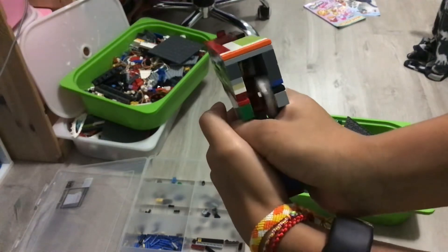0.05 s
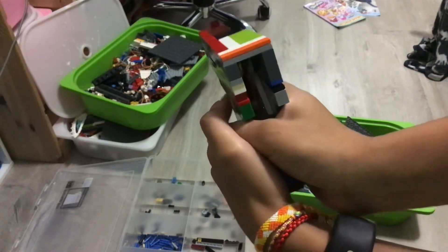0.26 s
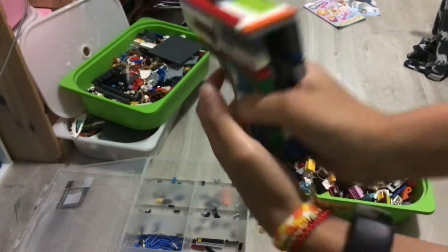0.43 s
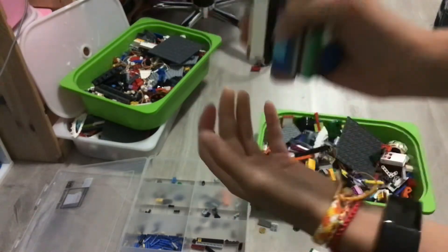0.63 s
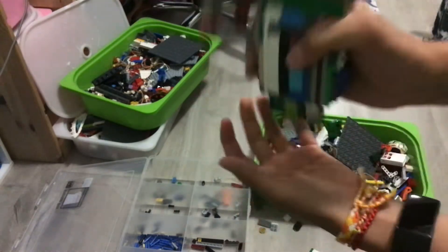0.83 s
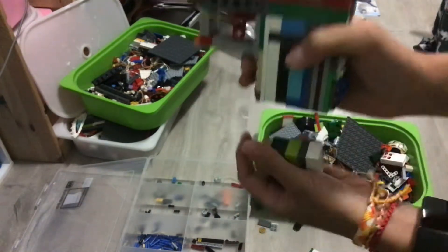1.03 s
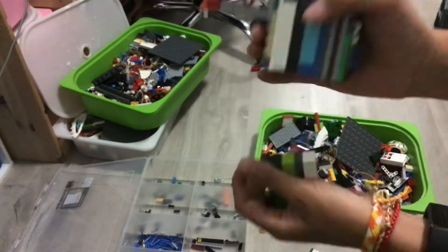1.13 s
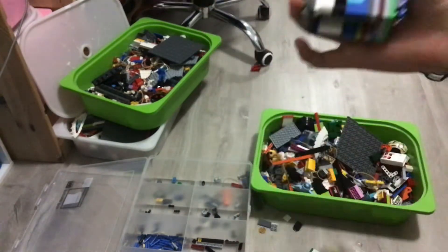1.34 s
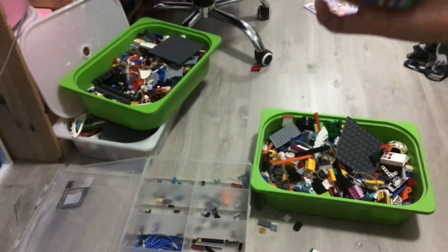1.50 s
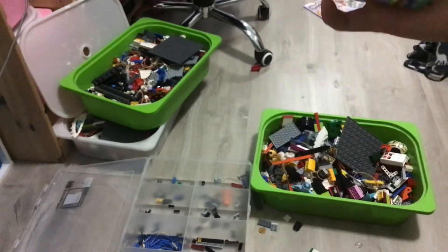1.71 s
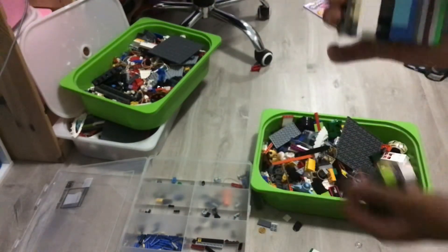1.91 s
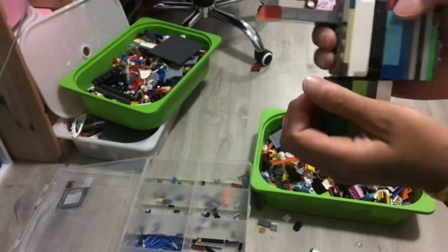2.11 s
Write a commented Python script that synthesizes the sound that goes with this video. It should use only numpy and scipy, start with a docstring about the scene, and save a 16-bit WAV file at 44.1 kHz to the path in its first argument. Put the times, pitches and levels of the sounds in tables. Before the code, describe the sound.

Plastic brick toy handled up close: a brief sliding scrape, a loud bright snap with quick fading bounces, faint clicks and a hollow knock as a piece slides out, a pause, then more clicks in a quiet room.

```python
"""First a fading sliding noise and the tail of an earlier click; then a toy of plastic bricks snaps shut
and bounces, a piece slides out into the palm with small clicks, and is caught again.
Each click is a short chatter of tiny impacts exciting the damped modes of the hollow bricks. Rubbing is
dense impacts on the same modes, knocks, thuds and squeaks are resonances with their own excitation,
and a quiet room adds a short bright tail, a low hum of air and a dull rustle of hands and sleeves."""
import sys
import numpy as np
from scipy import signal
from scipy.io import wavfile
from scipy.ndimage import uniform_filter1d

SR = 44100
rng = np.random.default_rng(int(sys.argv[2]) if len(sys.argv) > 2 else 0)


def gain_from_db(level_db):
    """Convert decibel levels to linear amplitude factors (20 dB per decade)."""
    decades = np.asarray(level_db, float) / 20
    return 10 ** decades


def unload_audio(sound):
    """Save the sound as a 16-bit wav file, at the path given as the first command line argument."""
    columns = np.transpose(np.atleast_2d(sound))
    # keep every value between -1 and 1, then stretch to whole-number steps
    steps = np.round(np.clip(columns, -1, 1) * 32767)
    wavfile.write(sys.argv[1], SR, steps.astype(np.int16))


N = 94815
LEAD = 4410  # samples computed ahead of the first audible one

# Room air, relative spectral density: (frequency [Hz], level [dB per Hz])
AIR_SPECTRUM = [(18, -31), (30, -1), (165, -3), (210, -13), (295, -4), (721, -16), (937, -34), (1760, -26),
                (3140, -34), (8300, -33), (16000, -43)]
AIR_DB = -70  # rms
# Reverberation time: (frequency [Hz], t60 [s])
ROOM_DECAY = [(150, 0.15), (600, 0.22), (1500, .33), (3000, .33), (4500, .28), (6000, .3), (9000, .24),
              (14000, .2)]
# Reflected energy relative to the direct sound, and the fade-in time of the tail
ROOM_DB, ROOM_GAP_S, NEAR_DB, NEAR_T60_S = -15.5, .008, -10.5, 0.086
# Rustle of hands and sleeves: (time [s], mean level [dB])
RUSTLE_LEVELS = [(0, -82), (0.698, -88), (.85, -68.5), (1.0, -74), (1.2, -80), (1.45, -85), (1.6, -75.5),
                 (1.9, -72.5), (2.15, -72)]

# Modes of the bricks and of the whole toy: (frequency [Hz], relative level [dB], longest t60 [s])
THUD_MODES = [(120, -2, .04), (227, -1.5, .025), (330, -2.5, .03)]
HOLLOW_MODES = [(487, -8, .025), (590, 1, .03), (690, 1, .03)]
LOW_MODES = [(1060, -6, 0.0064), (1380, -2.5, .009), (1730, -0.5, .009), (1960, -2, 0.012),
             (2300, 0, 0.008), (2830, 1.5, 0.0091), (3250, 1, .008), (3590, -3, .007)]
MID_MODES = [(3850, -2, .008), (4250, -2.5, .007), (4640, 0.5, .008), (4810, -0.5, .008),
             (5350, -2.5, .005), (5770, 1.5, .007), (6180, -0.5, .006), (6780, 0, 0.0069)]
HIGH_MODES = [(7660, 0.5, .005), (8200, 0, .005), (8700, 0.5, .005), (9130, 0, .005), (9800, -9.5, .003),
              (10900, -16, .002), (12000, -18, .002), (14000, -21, .002)]
MODE_GROUPS = (LOW_MODES, MID_MODES, HIGH_MODES)
# Pass band of each group of modes: (lower edge [Hz], upper edge [Hz])
GROUP_BANDS = [(800, 3800), (3500, 7500), (6800, 16000)]
DETUNE, COLOUR_DB = .012, 1.5  # spread of mode frequency (relative) and of mode level
FALL_DB_PER_OCTAVE = 16  # away from the strongest pitch
MOST_CYCLES = 36  # a mode's t60 lasts no longer than this many periods
STILL = np.zeros((2, 8))  # no spread of frequency or level

# Strokes of loose parts sliding: (time [s], low modes [dB], middle modes [dB], high modes [dB])
SLIDE_STROKES = [
    [(0, -64, -66, -77), (.05, -72, -68, -71), (.09, -62, -72, -76), (.15, -82, -83, -86),
     (.2, -76, -74, -74)],
    [(.6, -87, -89, -99.5), (.66, -89, -82.5, -90.5), (.73, -65, -73.5, -81), (.76, -62.5, -68.5, -73),
     (.79, -65, -76.5, -81), (.82, -71.5, -70, -73), (.86, -66, -76, -75.5), (.92, -84, -73.5, -82),
     (1.0, -80, -80, -91.5), (1.2, -89, -94.5, -109)],
    [(1.98, -100, -100, -105), (2.04, -90, -86, -84.5), (2.06, -66.5, -67.5, -68),
     (2.11, -72, -71.5, -72.5), (2.15, -64, -60, -69)],
]
RUBS_PER_S, IMPACTS_PER_S = 14000, 10000
SIZE_DB = 2  # impact level spread, per e-fold of chance
# Squeaks swelling just before some clicks: (end time [s], level at the end [dB])
SQUEAKS = [(.1565, -60), (.216, -40.5), (.879, -58)]
SQUEAK_HZ, SQUEAK_RISE_DB_PER_S, SQUEAK_WIDTH_HZ = 7940, 2000, 450
# Pushes of the whole toy under the larger blows: (time [s], deep level [dB], hollow level [dB])
THUDS = [(.2155, -40, -39), (.833, -57, -58), (.850, -63, -52), (.875, -64, -52.5), (1.313, -69, -64),
         (1.9945, -62, -57), (2.051, -59, -43), (2.134, -54.5, -55)]
# Hollow knocks of the piece against the palm: (time [s], level [dB], length [s], pitch [Hz])
KNOCKS = [(.772, -54.5, 0.011, 1330), (.833, -41.5, 0.0088, 1390), (.845, -53, 0.015, 1310),
          (2.052, -37, 0.0024, 1730), (2.094, -45.5, 0.0047, 1720), (2.125, -51.5, 0.013, 1800),
          (2.138, -48, .009, 1750)]
KNOCK_WIDTH_HZ, KNOCK_WIDE_DB = 260, -3
# Clicks: (time [s], middle level [dB], low level [dB], high level [dB], chatter length [s],
# strongest low pitch [Hz], strongest middle pitch [Hz]); a chatter lasts at least 0.6 ms
CLICKS = [(.0868, -38, -49, -45, .0032, 2300, 4600), (.1562, -40, -39, -41, .003, 2700, 5000),
          (.2118, -50, -42.5, -55.5, .0031, 2790, 4500), (.2157, -12, -26, -19, .0026, 3260, 4700),
          (.2236, -18.5, -33.5, -27.5, .0026, 3100, 4900), (.2303, -25, -42, -28, .002, 3000, 4800),
          (.2360, -28, -49, -32, .0028, 3300, 4930), (.2420, -35.5, -41.5, -44, .003, 3287, 4800),
          (.3892, -75, -62, -67, .0014, 1469, 5000), (.4394, -73, -64, -76, .003, 3300, 3980),
          (.7400, -68, -65.5, -72, .0043, 2500, 4500), (.7462, -53, -57, -48.5, 0.0028, 2700, 4800),
          (.7530, -55, -55.5, -72, .0026, 3300, 4000), (.7722, -66.5, -57.5, -75, 0.00407, 1500, 4000),
          (.8057, -57.5, -59, -54.5, .002, 3300, 4217), (.8122, -53.5, -64, -53, .003, 3000, 5400),
          (.8305, -62, -47, -67, .003, 2700, 4100), (.8530, -61, -47.5, -64, .0043, 2500, 4100),
          (.8790, -46.5, -66, -44, .002, 2800, 6400), (.8886, -64, -45, -62, .003, 2820, 4000),
          (.9275, -64, -72, -60, .001, 2520, 6000), (1.3140, -88, -68, -105, 0.0019, 1050, 4000),
          (1.9948, -99, -74, -99, .0022, 1000, 4000), (2.0504, -39, -46, -39, .0017, 1900, 4500),
          (2.0521, -40.5, -42, -42.5, .003, 1730, 4500), (2.0600, -48, -48, -62, .006, 2000, 5200),
          (2.0910, -56, -56.5, -65, .002, 1800, 4000), (2.0938, -43.5, -41.5, -41, .002, 1780, 4000),
          (2.1345, -52, -43.5, -63, .003, 2800, 4000)]
# The click before the start, of which only the tail is heard: the same columns without time
EARLIER_CLICK = (-30, -32.5, -34.5, -0.01, 2800, 5200.5)
EARLIER_S = -.018
FIRM_IMPACT_DB = 8  # at the height of the chatter
RATTLE_DB, RATTLE_T60_S = -14.5, 0.042

DIP_HZ, DIP_WIDTH_HZ = 850, 130  # a narrow dip in the toy's sound, where its hollow and low modes cancel
MIC_HZ, MIC_WIDTH_HZ, MIC_PEAK_DB, MIC_LOW_HZ = 8380, 940, 5.5, 45


def evened(x):
    """Normalization to unit rms."""
    return x / np.sqrt(np.mean(x ** 2) + 1e-20)


def peaked(x, db):
    """Short-time level: the loudest 3 ms are set to db rms."""
    return gain_from_db(db) * x / np.sqrt(uniform_filter1d(x ** 2, size=132).max())


def read(points, hz):
    """Interpolation of a table along a logarithmic frequency axis."""
    f, value = np.transpose(points)
    return np.interp(np.log(hz + 1), np.log(f + 1), value)


def add(mix, s, sound):
    """Superposition: a sound is added to the mix from time s on."""
    part = mix[round(s * SR) + LEAD:][:len(sound)]
    part += sound[:len(part)]


def band(x, low_hz, high_hz, order=3):
    """Band limitation by a Butterworth filter."""
    return signal.sosfilt(signal.butter(order, (low_hz, high_hz), "band", fs=SR, output="sos"), x)


def air():
    """Stationary broadband noise: random Fourier coefficients shaped by a spectrum, with drifting patches."""
    frames, hz = N // 256 + 5, np.fft.rfftfreq(1024, 1 / SR)
    real, imaginary, patches = rng.standard_normal((frames, 513, 3)).T
    patches = uniform_filter1d(patches, size=8, axis=0)
    patches = evened(uniform_filter1d(patches, size=12, axis=1))
    z = (real + 1j * imaginary) * gain_from_db(read(AIR_SPECTRUM, hz)[:, None] + 0.5 * patches)
    return gain_from_db(AIR_DB) * evened(signal.istft(z, nperseg=1024, noverlap=768)[1][:N])


def rustle():
    """Amplitude-modulated noise: a dull band whose level wanders in small lumps."""
    s, db = np.transpose(RUSTLE_LEVELS)
    lumps = evened(uniform_filter1d(rng.standard_normal(N), size=900))
    dull = band(rng.standard_normal(N), 250, 850)
    return gain_from_db(np.interp(np.arange(N) / SR, s, db) + 2.0 * lumps) * evened(dull)


def room(x):
    """Reverberation as convolution: sparse taps of random sign, near surfaces first, then a banded tail."""
    size = SR // 2
    taps, t = np.zeros(size), np.arange(size) / SR
    at = np.arange(20, size - 12, 12)
    taps[at + rng.integers(0, 12, len(at))] = rng.choice([-1., 1.], len(at))
    near = taps * gain_from_db(-60 * t / NEAR_T60_S)
    # each frequency band dies at its own rate
    hz, frame_t, z = signal.stft(taps, SR, nperseg=256)
    decay = gain_from_db(-60 * frame_t / read(ROOM_DECAY, hz)[:, None])
    tail = signal.istft(z * decay, SR, nperseg=256)[1][:size]
    tail = tail * np.clip(t / ROOM_GAP_S, 0, 1) ** 2
    near = gain_from_db(NEAR_DB) * near / np.linalg.norm(near)
    tail = gain_from_db(ROOM_DB) * tail / np.linalg.norm(tail)
    return signal.fftconvolve(x, near + tail)[:len(x)]


def ring(modes, chance, edges=None, top_hz=None):
    """Modal impulse response: damped sinusoids, varied in frequency and level by chance."""
    hz, db, t60 = np.transpose(modes)[:, :, None]
    t, c = np.arange(3000) / SR, chance[:, :len(modes), None]
    if top_hz:
        db = db - FALL_DB_PER_OCTAVE * abs(np.log2(hz / top_hz))
    hz = np.minimum(hz * (1 + DETUNE * c[0]), 16000)
    t60 = np.minimum(t60, MOST_CYCLES / hz)
    out = (gain_from_db(db + COLOUR_DB * c[1] - 60 * t / t60) * np.sin(2 * np.pi * hz * t)).sum(0)
    return band(out, *edges) if edges else out


def impacts(size, per_s):
    """Random impulse train: sparse impacts of random sign, a few of them large."""
    u = rng.random((size, 3))
    happens = u[:, 0] < per_s / SR
    return happens * np.sign(u[:, 1] - .5) * gain_from_db(-SIZE_DB * np.log(u[:, 2] + .02))


def slide():
    """Friction as dense small impacts that excite each group of modes under the level of the stroke."""
    t = (np.arange(N + LEAD) - LEAD) / SR
    rubs, out = impacts(N + LEAD, RUBS_PER_S), 0
    for rows in SLIDE_STROKES:
        s, *levels = np.transpose(rows)
        for modes, db, edges in zip(MODE_GROUPS, levels, GROUP_BANDS):
            rung = signal.oaconvolve(rubs, ring(modes, STILL, edges))[:len(t)]
            # silent outside its stroke, but the last stroke holds its level to the end
            after = db[-1] if s[-1] > 2 else -200
            out = out + gain_from_db(np.interp(t, s, db, -200, after)) * evened(rung)
    return out


def squeak(s, db):
    """Exponential growth of a high tone up to the click, made fuzzy by narrow-band noise on its phasor."""
    t = np.arange(-1500, 0) / SR
    r = np.exp(-np.pi * SQUEAK_WIDTH_HZ / SR)
    noise = signal.lfilter([1], [1, -r], rng.standard_normal((1500, 2)), axis=0)
    fuzz = 1 + 0.3 * evened(noise) @ [1, 1j]
    tone = (fuzz * np.exp(2j * np.pi * SQUEAK_HZ * t)).real
    return s - 1500 / SR, gain_from_db(db + SQUEAK_RISE_DB_PER_S * t) * np.sqrt(2) * tone


def thud(s, deep_db, hollow_db):
    """Excitation by a soft force pulse, whose smoothness favours the lowest modes."""
    deep_chance, hollow_chance = rng.standard_normal((2, 2, 8))
    deep = np.convolve(np.hanning(60), ring(THUD_MODES, deep_chance))[:3000]
    hollow = np.convolve(np.hanning(30), ring(HOLLOW_MODES, hollow_chance))[:3000]
    return s, peaked(deep, deep_db) + peaked(hollow, hollow_db)


def knock(s, db, length_s, hz):
    """Noise excitation of a cavity: a soft rubbing blow drives one hollow tone and the brick modes."""
    t = np.arange(3000) / SR
    drive = rng.standard_normal(3000) * np.exp(-(2 * t / length_s - 1) ** 4)
    tone = np.exp(-np.pi * KNOCK_WIDTH_HZ * t) * np.sin(2 * np.pi * hz * t) * np.minimum(t * hz, 1)
    low, mid, high = (ring(m, STILL, e) for m, e in zip(MODE_GROUPS, GROUP_BANDS))
    hollow = evened(signal.fftconvolve(drive, tone))
    wide = evened(signal.fftconvolve(drive, low + mid + .4 * high))
    return s, peaked(hollow + gain_from_db(KNOCK_WIDE_DB) * wide, db)


def click(s, mid_db, low_db, high_db, length_s, low_hz, mid_hz):
    """Modal excitation by one firm impact in a chatter of small ones, then a dying rattle of loose bricks."""
    t = np.arange(1500) / SR
    u = np.clip(t / max(length_s, .0006), 0, 1)
    chatter = np.sin(np.pi * u ** 0.5) ** 0.5
    shape = chatter + u * gain_from_db(RATTLE_DB - 60 * t / RATTLE_T60_S)
    firm = gain_from_db(FIRM_IMPACT_DB) * (np.arange(1500) == np.argmax(shape))
    levels, pitches = (low_db, mid_db, high_db), (low_hz, mid_hz, None)
    chances = rng.standard_normal((3, 2, 8))
    out = 0
    for modes, db, chance, edges, top_hz in zip(MODE_GROUPS, levels, chances, GROUP_BANDS, pitches):
        drive = firm + shape * impacts(1500, IMPACTS_PER_S)
        out = out + peaked(signal.fftconvolve(drive, ring(modes, chance, edges, top_hz)), db)
    return s, out


def scene():
    """Superposition of the toy's direct sound, its reverberation, the air and the rustle."""
    toy = slide()
    add(toy, *click(EARLIER_S, *EARLIER_CLICK))
    for rows, source in (SQUEAKS, squeak), (THUDS, thud), (KNOCKS, knock), (CLICKS, click):
        for row in rows:
            add(toy, *source(*row))
    toy = signal.lfilter(*signal.iirnotch(DIP_HZ, DIP_HZ / DIP_WIDTH_HZ, SR), toy)
    return ((toy + room(toy))[LEAD:] + air() + rustle())[None]


def band_limit(x):
    """A steep low-pass at the top of the band."""
    return signal.sosfilt(signal.butter(12, 16800, fs=SR, output="sos"), x)


def record(dry):
    """Linear filtering by the microphone: a treble resonance, no deep bass and an upper band limit."""
    r = np.exp(-np.pi * MIC_WIDTH_HZ / SR)
    poles = [1, -2 * r * np.cos(2 * np.pi * MIC_HZ / SR), r * r]
    peak = signal.lfilter([1 - r, 0, r - 1], poles, dry)
    coloured = dry + (gain_from_db(MIC_PEAK_DB) - 1) * peak
    return band_limit(band(coloured, MIC_LOW_HZ, 16000, order=4))


dry = scene()
out = record(dry)
unload_audio(out)
```